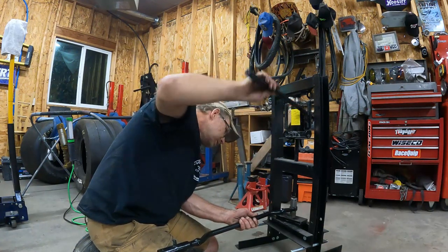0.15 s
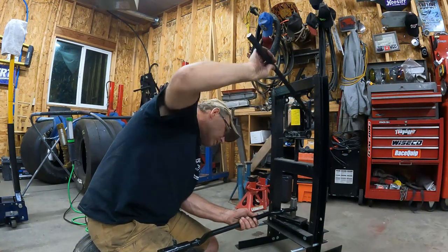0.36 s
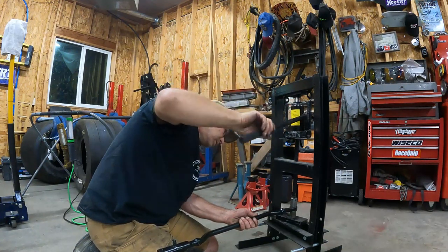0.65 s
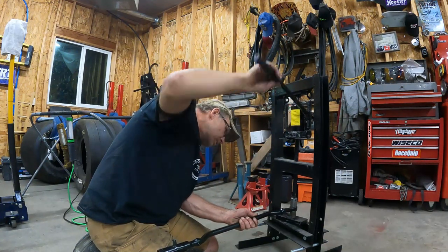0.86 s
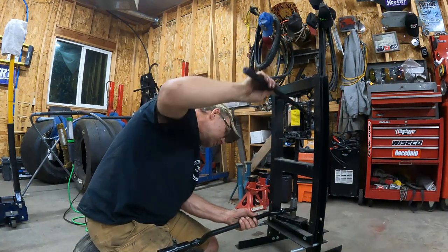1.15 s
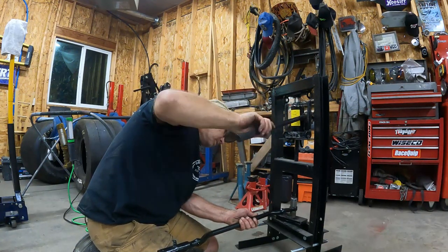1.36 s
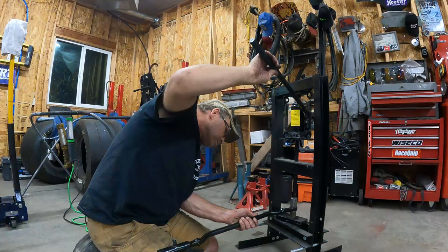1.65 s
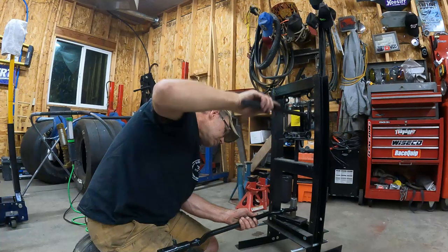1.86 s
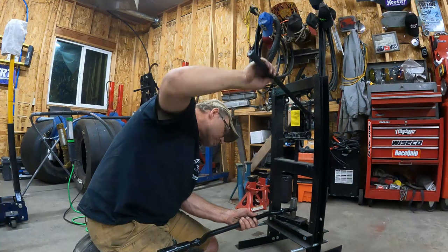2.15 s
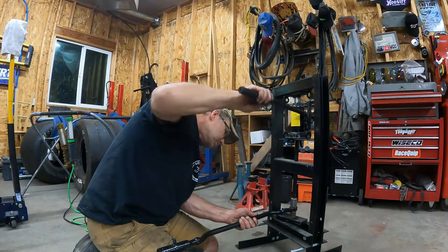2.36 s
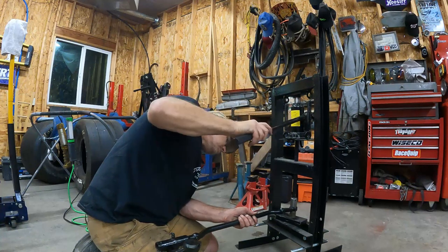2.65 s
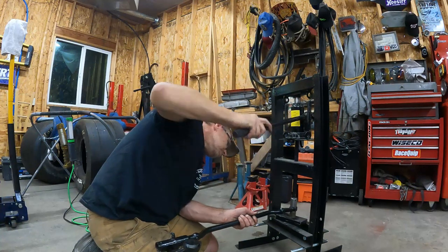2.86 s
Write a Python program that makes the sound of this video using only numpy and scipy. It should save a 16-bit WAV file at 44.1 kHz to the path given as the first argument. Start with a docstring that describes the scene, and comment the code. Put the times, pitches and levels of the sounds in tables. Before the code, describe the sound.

Light metallic clinks and rattles come in quick, regular clusters as a hydraulic press handle is worked up and down. The steel rings slightly in a quiet garage, and the loaded press gives a low clonk at the end.

```python
"""Hand-pumped hydraulic press in a wooden garage

At each turn of the handle the loose linkage rattles and clinks, and the steel frame rings on.
Pump friction makes the frame sing briefly; near the end the loaded frame gives a low clonk.
Just past halfway one ring stops short and a quieter moment follows, over faint room noise."""
import sys
import numpy as np
from scipy import signal
from scipy.fft import rfft, irfft
from scipy.io import wavfile
from scipy.ndimage import uniform_filter1d

SR = 44100
rng = np.random.default_rng(int(sys.argv[2]) if len(sys.argv) > 2 else 0)


def int16_out(signal):
    """Quantize to a 16-bit WAV file."""
    q = np.round(np.clip(np.atleast_2d(signal).T, -1, 1) * 32767)
    wavfile.write(sys.argv[1], SR, q.astype(np.int16))


N = 132300
TIME_S = np.arange(N) / SR


def amp(db):
    return 10 ** (np.asarray(db) / 20)


def unit_rms(x):
    return x / np.sqrt(np.mean(x ** 2) + 1e-20)


def lookup(points, hz):
    point_hz, value = np.transpose(points)
    return np.interp(np.log(hz + 1), np.log(point_hz + 1), value)


def add(mix, start_s, sound):
    part = mix[round(start_s * SR):][:len(sound)]
    part += sound[:len(part)]


def colour(x, spectrum):
    size = x.shape[-1]
    return irfft(rfft(x) * amp(lookup(spectrum, np.fft.rfftfreq(size, 1 / SR))), size)


def noise(shape, spectrum):
    return unit_rms(colour(rng.standard_normal(shape), spectrum))


def colour_causal(x, spectrum):
    """Minimum-phase filter: clicks do not smear backwards."""
    log_gain = np.log(amp(lookup(spectrum, abs(np.fft.fftfreq(8192, 1 / SR)))))
    taps = np.fft.ifft(np.exp(np.conj(signal.hilbert(log_gain)))).real[:4096]
    return signal.oaconvolve(x, taps)[:len(x)]


def ring(x, hz, t60_s, build_s=0.0033):
    """One mode: two resonators in series, so it builds briefly, then decays."""
    w = 2 * np.pi * hz / SR
    decay, build = amp(-60 / (max(t60_s, .003) * SR)), amp(-60 / (build_s * SR))
    for r, gain in ((decay, 1), (build, 2 * (1 - build))):
        x = signal.lfilter([0, gain * np.sin(w)], [1, -2 * r * np.cos(w), r * r], x)
    return x


# Room noise and rumble spectra: freq_hz, gain_db
AIR_SPECTRUM = [(35, -30), (60, -28), (167, 4), (298, -2), (376, -10.5), (442, -7.5), (754, -12.5),
                (888, -19.5), (1260, -1), (1590, -8.5), (5070, -35), (8640, -45), (12500, -50),
                (15400, -72)]
RUMBLE_SPECTRUM = [(10, -21), (30, 5), (60, 5), (110, -38), (300, -67)]
# Left-right likeness of the room noise: freq_hz, correlation
AIR_CORRELATION = [(60, 1), (130, 0.24), (290, 0.32), (640, 0.078), (1410, 0.6), (3100, 0.066),
                   (6820, 0.21), (15000, 0.34)]


def air():
    """Room noise, partly shared by both sides, over a separate rumble in each."""
    hz = np.fft.rfftfreq(N, 1 / SR)
    left, other = rfft(rng.standard_normal((2, N)))
    shared = np.clip(lookup(AIR_CORRELATION, hz), 0, 1)
    right = shared * left + np.sqrt(1 - shared ** 2) * other
    room = irfft(np.array([left, right]) * amp(lookup(AIR_SPECTRUM, hz)), N)
    return amp(-63.5) * unit_rms(room) + amp(-76.5) * noise((2, N), RUMBLE_SPECTRUM)


# Reverb decay: freq_hz, t60_s
GARAGE_DECAY = [(150, 0.25), (400, 1), (1000, 0.35), (2500, 0.61), (6000, 0.51), (12000, 0.46)]
# Reverb side against mid: freq_hz, gain_db
GARAGE_SIDE = [(100, -12), (400, -9), (1000, -5.5), (3000, -2.5), (7000, -6.5), (12000, -6.5)]


def garage(x, reverb_db=-6, crossfade_s=0.888, left_db=-1.0, left_lag_s=15e-6):
    """Direct sound slightly right; three reverb tails slowly crossfade, so no fixed colour stays."""
    out = np.array([x, x])
    onset = np.clip((TIME_S[:SR] - .002) / 0.0017, 0, 1)
    for k in range(3):
        hz, t, bins = signal.stft(rng.standard_normal((2, SR)) * onset, SR, nperseg=256)
        decay = amp(-60 * t / lookup(GARAGE_DECAY, hz)[:, None])
        mid, side = signal.istft(bins * decay, SR, nperseg=256)[1][:, :SR]
        side = colour(side, GARAGE_SIDE)
        tail = np.array([mid + side, mid - side]) * amp(reverb_db) / np.linalg.norm(mid)
        crossfade = np.sqrt(2 / 3) * np.cos(np.pi * (TIME_S / crossfade_s + k / 3))
        out += signal.fftconvolve((x * crossfade)[None], tail, axes=1)[:, :N]
    lag = np.exp(-2j * np.pi * np.fft.rfftfreq(N, 1 / SR) * left_lag_s)
    return np.array([amp(left_db / 2) * irfft(rfft(out[0]) * lag, N), amp(-left_db / 2) * out[1]])


# Hiss envelope: time_s, level_db
HISS_LEVELS = [(2.548, -76.5), (2.62, -71), (2.8, -67.5), (3.0, -75)]
# Hiss spectrum: freq_hz, gain_db
HISS_SPECTRUM = [(1500, -2), (3000, -8), (6500, 1), (8500, -12.5), (12500, -14), (15000, -54)]


def hiss():
    """Faint treble hiss that swells after the clonk."""
    return amp(np.interp(TIME_S, *np.transpose(HISS_LEVELS))) * noise(N, HISS_SPECTRUM)


# Floor bumps: start_s
BUMP_STARTS = [.595, 1.245, 2.065, 2.64]
# Floor bumps: level_db
BUMP_LEVELS = [-54, -64, -65, -59]


def floor_bumps(pitch_hz=79, rise_s=0.0158):
    """Soft bumps in the floor, a few low cycles each."""
    out, t = np.zeros(N), TIME_S[:6000]
    bump = (t / rise_s) ** 2 * np.exp(2 - 2 * t / rise_s) * np.sin(2 * np.pi * pitch_hz * t)
    for start_s, level_db in zip(BUMP_STARTS, BUMP_LEVELS):
        add(out, start_s, amp(level_db) * bump)
    return out


# Handle turns: start_s, length_s, level_db
RATTLE_SWELLS = [(0.188, 0.16, -47.5), (0.53, 0.094, -45.5), (0.852, 0.14, -50.5), (1.194, 0.081, -48.5),
                 (1.545, 0.16, -50.5), (1.818, 0.31, -53.5), (2.256, 0.11, -49), (2.581, 0.18, -56.5)]
# Rattle spectrum: freq_hz, gain_db
RATTLE_SPECTRUM = [(24, -55), (40, -46), (217, -3.5), (306, -9.5), (431, -4), (776, -10.5), (1040, -1.5),
                   (1580, -1.5), (2120, -12), (2400, -10), (3220, -11.5), (4650, -19.5), (5380, -15),
                   (9230, -34.5), (14000, -46)]


def rattle(contacts_per_s=250, spread_db=2):
    """Tiny random contacts swell with each turn of the handle."""
    swell = np.zeros(N)
    for start_s, length_s, level_db in RATTLE_SWELLS:
        swell += amp(level_db) * np.sin(np.pi * np.clip((TIME_S - start_s) / length_s, 0, 1)) ** .5
    strength = amp(spread_db * np.minimum(rng.exponential(1, N), 4))
    ticks = strength * (rng.random(N) < contacts_per_s / SR)
    grains = signal.oaconvolve(ticks, np.exp(-np.arange(600) / 390))[:N] * rng.standard_normal(N)
    return unit_rms(colour(grains, RATTLE_SPECTRUM)) * swell


def opening_wash(level_db=-58, t60_s=0.43):
    """Noisy ring dying away from a stroke just before the start."""
    return noise(N, RATTLE_SPECTRUM) * amp(level_db - 60 * TIME_S / t60_s)


# Loaded down stroke: time_s, level_db
FRICTION_LEVELS = [(0.581, -45), (0.646, -56.5), (0.666, -49.5), (0.692, -60), (0.716, -50), (0.738, -58),
                   (0.862, -59), (0.87, -46)]
# Frame modes rung by friction: pitch_hz, gain_db, t60_s
FRICTION_MODES = [(1327, -7.5, 0.17), (1423, -8.5, 0.066), (1490, -4.5, 0.12), (2060, -11, 0.26)]


def pump_friction(flicker_db=1.5):
    """Uneven friction in the pump keeps a few frame modes singing."""
    slips = rng.standard_normal(N)
    slips *= amp(flicker_db * unit_rms(uniform_filter1d(rng.standard_normal(N), 400)))
    tone = sum(amp(db) * unit_rms(ring(slips, hz, t60_s)) for hz, db, t60_s in FRICTION_MODES)
    return unit_rms(tone) * amp(np.interp(TIME_S, *np.transpose(FRICTION_LEVELS), -120, -120))


# Blows in the frame: start_s, level_db, shudder_s
CLONK_BLOWS = [(2.588, -27, 0.016), (2.602, -30, 0.024), (2.609, -46, 0.06), (2.677, -40.5, 0.016),
               (2.746, -62, 0.025), (2.799, -50, 0.024), (2.829, -56, 0.015), (2.885, -53, 0.028),
               (2.949, -58.5, 0.011)]
# Loaded frame modes: pitch_hz, gain_db, t60_s
LOADED_MODES = [(167, -20, 0.15), (176, -9.5, 0.18), (203, -4, 0.18), (273, 4.5, 0.18), (294, -3, 0.23),
                (325.6, -3, 0.33), (396, 1.5, 0.22), (485.6, 2.5, 0.34), (567, -5, 0.24), (587, 0.5, 0.19),
                (624, -7.5, 0.18), (965, -9, 0.17), (1040, -7.5, 0.38), (1100, -15, 0.2), (1303, -6, 0.36),
                (1413, -3.5, 0.099), (1465, -0.5, 0.14), (1530, -6, 0.12), (1930, -23, 0.17),
                (2010, -20, 0.43)]
# Blow and crack spectra: freq_hz, gain_db
BLOW_SPECTRUM = [(40, -44), (150, 0), (2500, -5), (6000, -29)]
CRACK_SPECTRUM = [(100, -24), (300, 13), (1500, -5), (3500, -5), (9000, -42)]


def clonk(ring_db=-12.5, crack_db=-8.5, waver_db=3):
    """The loaded frame shifts: shuddering blows ring its low modes, which waver with the loose joints."""
    blows, out, t = np.zeros(N), np.zeros(N), TIME_S[:6000]
    impulse = 24.3 * (t == 0)
    crack_envelope = np.minimum(t / 0.002, 1) * np.exp(-t / 0.011)
    for start_s, level_db, shudder_s in CLONK_BLOWS:
        shudder = (rng.standard_normal(len(t)) + impulse) * np.exp(-t / shudder_s)
        add(blows, start_s, amp(level_db) * shudder / np.linalg.norm(shudder))
        add(out, start_s, amp(level_db + crack_db) * crack_envelope * noise(len(t), CRACK_SPECTRUM))
    blows = colour_causal(blows, BLOW_SPECTRUM)
    for hz, gain_db, t60_s in LOADED_MODES:
        waver = unit_rms(uniform_filter1d(uniform_filter1d(rng.standard_normal(N), 900), 900))
        out += amp(gain_db + ring_db + waver_db * waver) * ring(blows, hz, t60_s)
    return out


# Crowded small modes: freq_hz, gain_db, t60_s
JANGLE_BANDS = [(2300, -18, .2), (2900, -3, 0.16), (3270, -7.5, 0.14), (3830, -12, 0.13), (4400, -12, 0.15),
                (4900, -7, 0.18), (6500, -26, .17), (9100, -24.5, 0.23), (12600, -15, 0.27),
                (14100, -27, .1)]


def jangle(clink_spectrum, rise_s=0.012):
    """Crowded small modes blur into noise after a clink and die band by band."""
    hz, t, bins = signal.stft(rng.standard_normal(9000), SR, nperseg=128)
    bands = np.array(JANGLE_BANDS)
    start_db = lookup(bands[:, :2], hz) + lookup(clink_spectrum, hz) - 60 * (hz < bands[0, 0])
    decay_db = 60 * t / lookup(bands[:, ::2], hz)[:, None]
    sound = signal.istft(bins * amp(start_db[:, None] - decay_db), SR, nperseg=128)[1]
    return sound * np.minimum(TIME_S[:len(sound)] / rise_s, 1)


# Steel frame modes: pitch_hz, gain_db, t60_s
FRAME_MODES = [(194, -23, 0.72), (260.4, 10.5, 0.26), (326.5, 7, 0.27), (925, -9.5, 0.84),
               (1020, -3.5, 0.44), (1060.7, -17, 0.49), (1250, -19, 0.95), (1319, -5, 0.41),
               (1473, -7, 0.28), (1770, 5, 0.05), (2060, -23, 1), (3050, -10, 0.15), (3260, -3.5, 0.19),
               (3420, -5, 0.069), (3940, -41, 0.31), (3980, -9, 0.12), (4260, -11, 0.22),
               (4350, -12.5, 0.21)]


def frame_ring(strikes, already_ringing, level_db=-21.5, opening_db=-58):
    """Each strike kicks the long frame modes according to its spectrum."""
    out = np.zeros(N)
    for hz, gain_db, t60_s in FRAME_MODES:
        kicks = np.zeros(N)
        kicks[0] = amp(opening_db) * already_ringing
        for start_s, spectrum in strikes:
            kicks[round(start_s * SR)] += amp(lookup(spectrum, hz)) * rng.choice([-1, 1])
        out += amp(level_db + gain_db) * ring(kicks, hz, t60_s)
    return out


# Clash, tick and rasp bands of the small parts: low_hz, high_hz
CONTACT_BANDS = [(2600, 4815), (4900, 7140), (8600, 22000)]


def clink(parts_db, handle_hz, pin_hz, link_hz, contact_ms, handle_t60_s, thump_s=0.016):
    """A short scraping contact rings handle, pin and link over a slower thump."""
    t = TIME_S[:5000]
    rise = np.minimum(1000 * t / (0.31 * contact_ms), 1) ** 2
    contact = rise * np.exp(-1000 * t / contact_ms)
    touch = rng.standard_normal(len(t)) * contact
    push = rng.standard_normal(len(t)) * t / thump_s * np.exp(-t / thump_s)
    scrape = rng.standard_normal(len(t)) * contact ** .55  # outlasts the contact
    filters = [signal.butter(3, band, "band", fs=SR, output="sos") for band in CONTACT_BANDS]
    clash, tick, rasp = map(signal.sosfilt, filters, (touch, scrape, scrape))
    thump = ring(push, hz=233, t60_s=0.018)
    handle = ring(touch + contact * np.sin(2 * np.pi * handle_hz * t), handle_hz, handle_t60_s)
    handle += amp(8) * ring(touch, handle_hz * 1.07, handle_t60_s)  # beats with the first mode
    pin = ring(touch + contact * np.sin(2 * np.pi * pin_hz * t), pin_hz, t60_s=0.0046)
    link = unit_rms(clash) + amp(-2.5) * unit_rms(ring(touch, link_hz, t60_s=0.021))
    parts = thump, handle, pin, link, tick, rasp
    return sum(amp(db) * part / (2 * abs(part).max()) for db, part in zip(parts_db, parts))


# Linkage contacts: start_s, level_db, thump_db, handle_db, pin_db, link_db, tick_db, rasp_db,
# handle_hz, pin_hz, link_hz, contact_ms, handle_t60_s
LINKAGE_CLINKS = [(0.187, -48.5, -5.5, 5.5, -5, -17, -29, -20, 1054, 1820, 2740, 2.2, 0.053),
                  (0.209, -35.5, -35, -17, -15, -16, -14.5, -19, 1070, 2060, 2820, 6.9, 0.03),
                  (0.216, -30.5, -27, -28, -9.5, -7, -32, -30, 940, 2060, 3460, 3.4, 0.033),
                  (0.221, -35.5, -33, -10, -15, -20, -13, -33, 1070, 2240, 3000, 3.9, 0.032),
                  (0.238, -25.5, -20.5, -4.5, -15.5, -17, -33, -43, 1030, 2255, 3420, 2.8, 0.022),
                  (0.255, -33, -12.5, -31, -14, -11, -16, -26, 1280, 1880, 3220, 3.3, 0.03),
                  (0.299, -18, -24, -12.5, -18, -5.5, -16, -33, 1013, 2033, 4210, 3.45, 0.01),
                  (0.517, -30, -20, -10.5, -17, -13, -42, -49, 1165, 1740, 3640, 1.6, 0.088),
                  (0.522, -37.5, -56, -37, 0.5, -5.5, -39, -33, 1010, 1960, 3420, 1.6, 0.03),
                  (0.544, -26, -18.5, -10.5, -15, -10.5, -11.5, -27, 1040, 2110, 3420, 1.7, 0.016),
                  (0.559, -22, -28, -6.5, -16, -12.5, -22, -32, 1036, 1770, 4340, 1.3, 0.024),
                  (0.57, -28.5, -17.5, -6.5, -33, -27, -16, -23, 1250, 1770, 3070, 1.6, 0.018),
                  (0.611, -41, -30, -25, -14, -28, -33, -19, 1300, 2060, 2900, 2.2, 0.033),
                  (0.838, -48.5, -3, 2, -12, -18, -25, -17, 1070, 2060, 3220, 2.1, 0.036),
                  (0.862, -31.5, -21, -16, -19, -19, -14, -22, 1020, 1860, 4660, 5, 0.024),
                  (0.869, -33, -34, -10.5, -9, -7, -7.5, -25, 996, 2150, 2820, 5.6, 0.045),
                  (0.892, -35, -12, -3, -7.5, -16, -41, -27, 1078, 2270, 3600, 0.75, 0.023),
                  (0.914, -32, -12, -44, -35, -10, -22, -32, 1260, 2000, 3460, 3.4, 0.03),
                  (0.938, -19.5, -22, -11, -13.5, -5.5, -16, -38, 1014, 2047, 4040, 3.36, 0.013),
                  (1.086, -26.5, -33, -8, -7.5, -13.5, -22.5, -43, 1313, 2060, 3340, 1.8, 0.0073),
                  (1.174, -39, -11.5, -5.5, -6, -38, -23, -57, 1124, 1930, 2880, 1.8, 0.036),
                  (1.193, -39.5, -39, -2.5, 0.5, -15, -34, -44, 1010, 1870, 3790, 1.7, 0.03),
                  (1.206, -39.5, -34, -6, -5.5, -3, -25, -27, 1230, 2060, 3290, 2.7, 0.011),
                  (1.211, -28, -51, -24, -25, -6.5, -11.5, -25, 1160, 2150, 3050, 4.9, 0.023),
                  (1.227, -29, -16.5, -10, -15, -9, -21, -24, 1082, 2110, 3620, 3.7, 0.03),
                  (1.238, -24.5, -41, -14, -36, -16.5, -12.5, -37, 1046, 2040, 4360, 3.4, 0.017),
                  (1.25, -38, -38, -33, -11, -8, -15, -29, 1000, 1930, 3180, 1.84, 0.037),
                  (1.316, -48, -29, -4, -9, -22, -18, -29, 1004, 2130, 3220, 1.3, 0.023),
                  (1.543, -47.5, -3.5, 2.5, -9.5, -27, -34, -24, 1074, 2250, 2780, 3.7, 0.026),
                  (1.571, -38, -16, -14, -7.5, -6.5, -7.5, -20.5, 1020, 2300, 2770, 4.1, 0.035),
                  (1.597, -24, -21.5, -9, -14.5, -6.5, -24, -40, 1005, 2040, 3400, 3.75, 0.025),
                  (1.622, -37, -14, -17, -29, -30, -7, -21, 1080, 1740, 3400, 1.8, 0.025),
                  (1.654, -24.5, -16.5, -11.5, -11.5, -5, -12.5, -35, 970, 2014, 4170, 2.16, 0.014),
                  (1.822, -26, -22, -3, -15.5, -17, -68, -50, 1050, 2160, 2700, 0.92, 0.025),
                  (1.855, -36.5, -15.5, -2.5, -11, -40, -53, -56, 1054, 1994, 2950, 1.2, 0.035),
                  (1.888, -46, -1.5, 5, -0.5, -31, -39, -44, 1050, 2180, 2920, 1.6, 0.027),
                  (1.922, -31.5, -17.5, -42, -11, -5, -14, -28, 1020, 2167, 3050, 3.9, 0.03),
                  (1.956, -31.5, -36, -1, -9.5, -5.5, -43, -34, 1066, 2185, 3600, 2.9, 0.023),
                  (1.979, -32, -15.5, -7, -39, -13, -18, -29, 1012, 2140, 3800, 2.8, 0.014),
                  (2.029, -21, -20, -10, -18.5, -8, -43, -39, 1015, 2030, 3950, 2.6, 0.0085),
                  (2.057, -42, -18, -45, -32, -20, -31, -41, 935, 2060, 3960, 2.7, 0.038),
                  (2.22, -45.5, -6.5, -9.5, -13, -4.5, -29, -29, 1206, 1770, 3330, 1.2, 0.025),
                  (2.256, -53, -37, -3, -12, -13.5, -34, -45, 1304, 2050, 3300, 2.1, 0.026),
                  (2.279, -34, -13, -10.5, -19, -10, -35, -46, 1153, 1920, 3190, 3.2, 0.023),
                  (2.314, -35, -14.5, -2, -16, -10, -33.5, -45, 1037, 1850, 3590, 6.4, 0.023),
                  (2.326, -44, -38.5, -28, -4.5, -35, -34, -42, 1070, 2080, 3640, 1.7, 0.03),
                  (2.336, -45.5, -15, -3, -38, -19, -26, -15, 1020, 1910, 4100, 2.4, 0.019),
                  (2.969, -52.5, 2, 4.5, -10.5, -31, -21, -24, 1133, 2190, 3240, 3.4, 0.063)]
# Bands of the six parts, thump to rasp: centre_hz
PART_CENTRES = [250, 1100, 2100, 3700, 6500, 11000]
# Response of the six parts: gain_db
PART_GAINS = [4, 1.5, 4, -0.5, -3.5, 9.5]
# Radiation of the press: freq_hz, gain_db
PRESS_RADIATION = [(30, -37), (110, -13.5), (160, 4), (330, -1.5), (450, -4.5), (780, 1), (900, 4.5),
                   (9000, 12.5), (13000, -5), (16000, -95)]


def linkage(from_s, to_s):
    """The loose linkage clinks; each clink starts a jangle and strikes the frame."""
    out, strikes = np.zeros(N), []
    for start_s, level_db, *columns in LINKAGE_CLINKS:
        if from_s <= start_s < to_s:
            parts_db = level_db + np.add(columns[:6], PART_GAINS)
            spectrum = list(zip(PART_CENTRES, parts_db))
            add(out, start_s, clink(parts_db, *columns[6:]))
            add(out, start_s, jangle(spectrum))
            strikes.append((start_s, spectrum))
    out += frame_ring(strikes, already_ringing=from_s == 0)
    return colour_causal(out, PRESS_RADIATION)


def scene(stop_s=1.7312):
    """The press over room noise; ring and reverb stop short at stop_s, then pumping goes on."""
    early = TIME_S < stop_s
    first, second = linkage(0, stop_s), linkage(stop_s, N / SR)
    rest = hiss() + floor_bumps() + rattle() + pump_friction() + clonk()
    press = garage(first + rest * early) * early + garage(second + rest * ~early)
    return air() + opening_wash() + press


def record(dry, cutoff_hz=15600):
    """Steep low-pass."""
    taps = signal.firwin(511, cutoff_hz, window=("kaiser", 9), fs=SR)
    return signal.oaconvolve(dry, taps[None], "same")


dry = scene()
out = record(dry)
int16_out(out)
```